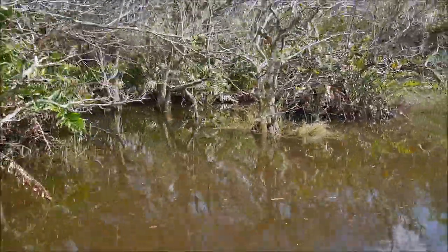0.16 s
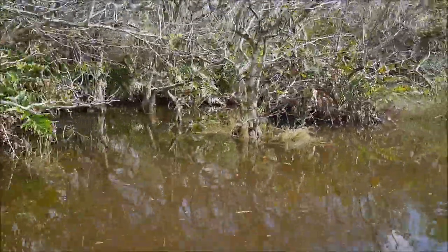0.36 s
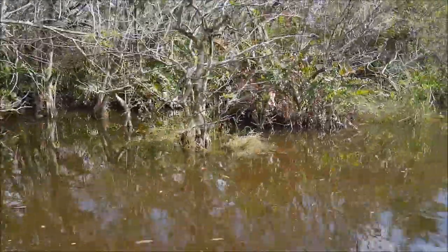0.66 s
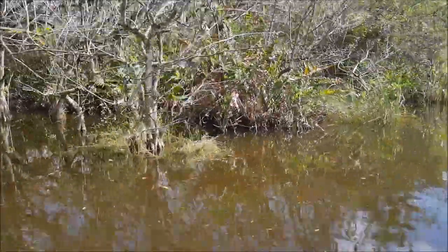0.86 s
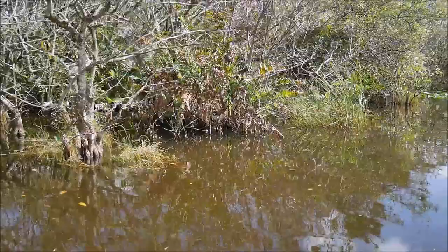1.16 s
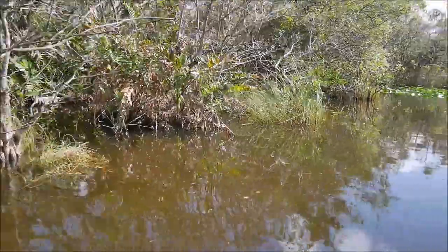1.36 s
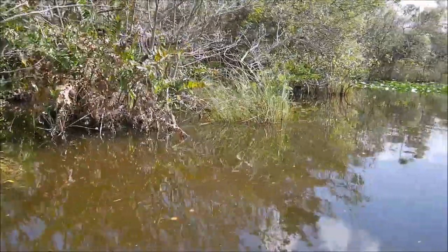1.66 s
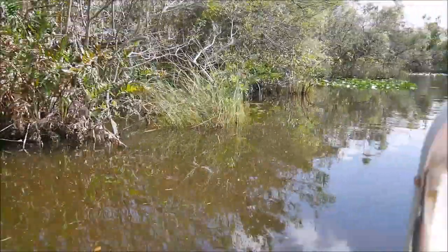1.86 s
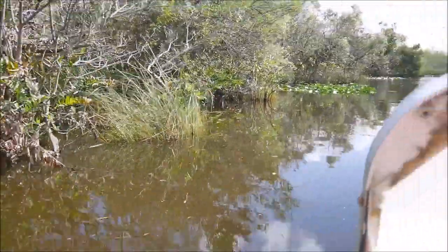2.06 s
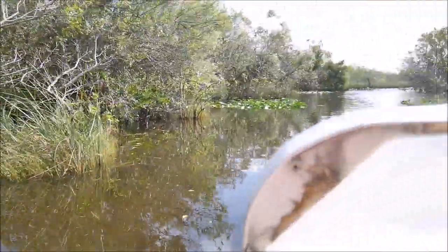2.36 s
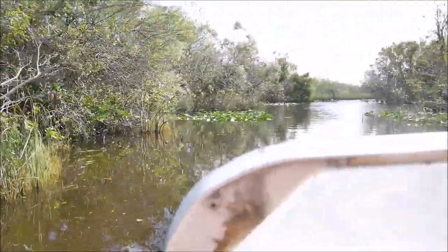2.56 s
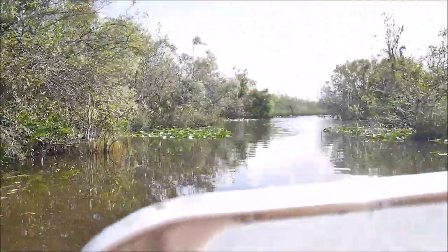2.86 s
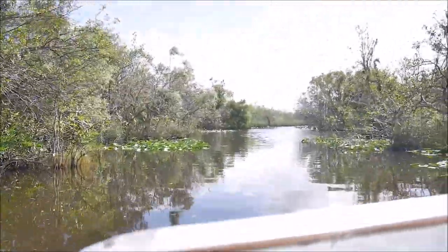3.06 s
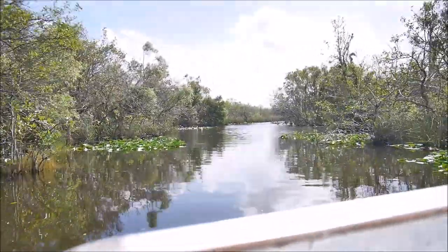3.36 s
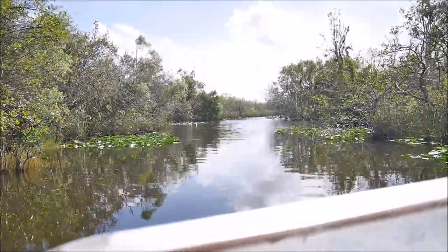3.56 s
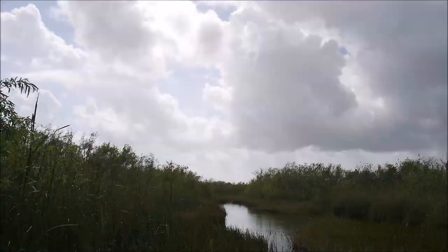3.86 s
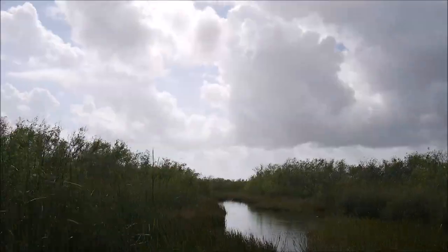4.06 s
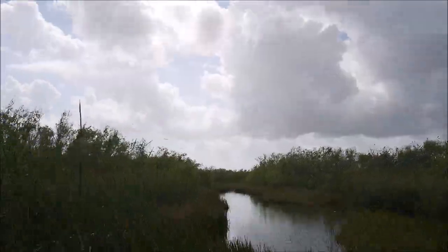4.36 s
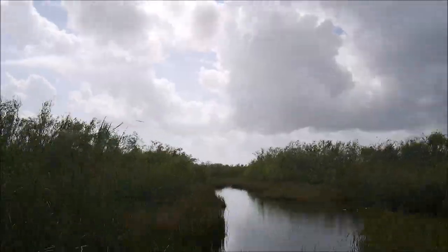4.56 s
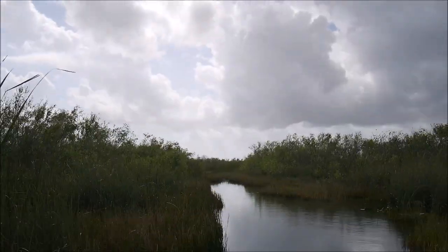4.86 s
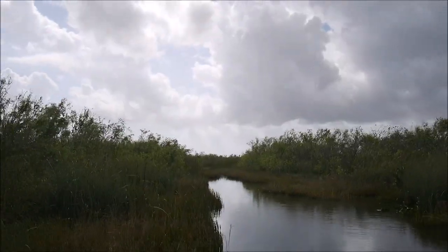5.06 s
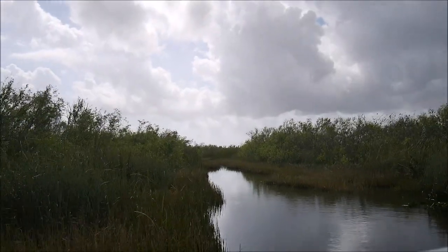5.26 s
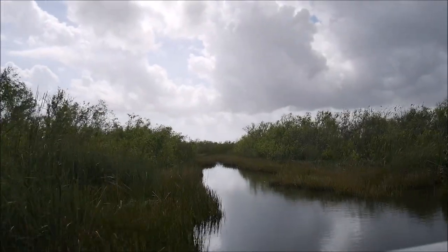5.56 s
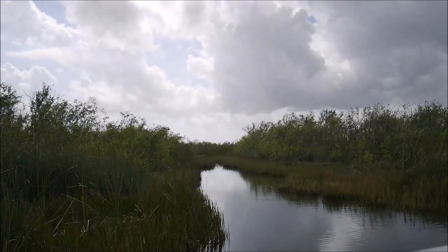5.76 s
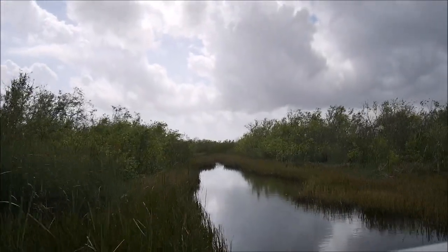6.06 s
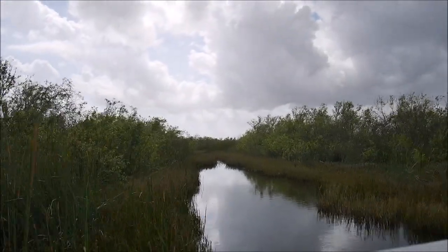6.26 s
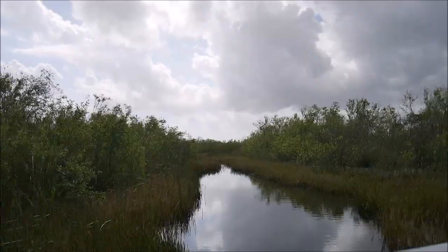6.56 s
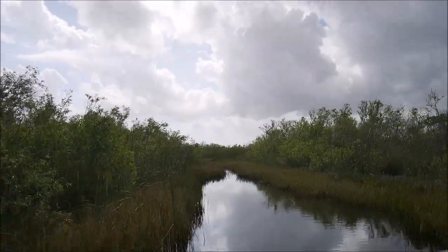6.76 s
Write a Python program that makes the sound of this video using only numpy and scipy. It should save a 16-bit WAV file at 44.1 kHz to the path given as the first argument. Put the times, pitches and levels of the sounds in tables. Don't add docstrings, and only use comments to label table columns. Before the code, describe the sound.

From 0 to 3.85 seconds an airboat idles on open water, heard from its deck. A low, harmonic engine drone and soft turbulent roar carry a quick flutter of about sixteen shaft turns per second; each turn brings uneven propeller swishes, airy whistles near 9 kHz that slide downward. The load and brightness drift gently. A thin gear whine near 1.75 kHz wavers in and out, clearest around 2.2 seconds. Light wind puffs appear from 2.8, with short buffets at 3.1 and 3.3. Sound cuts to silence until 4.15. Then, abruptly, the boat is at speed: a much louder, denser drone at about thirty turns per second, with rapid blade buzz and fainter high hiss. Sharp wind thumps and raspy flaps batter the stereo microphone, densest from 4.5 to 5.8, ducking the engine briefly. Bright slaps stand out near 5.4, 5.7, 6.1 and 6.5. It stops at full roar around 6.9.

```python
import sys
import numpy as np
from scipy import signal
from scipy.fft import rfft, irfft
from scipy.io import wavfile
from scipy.ndimage import uniform_filter1d

SR = 44100
rng = np.random.default_rng(int(sys.argv[2]) if len(sys.argv) > 2 else 0)


def wav_out(sig):
    wavfile.write(sys.argv[1], SR, np.round(np.clip(np.atleast_2d(sig).T, -1, 1) * 32767).astype(np.int16))


def invert_db(level):
    return 10 ** (np.asarray(level, dtype=float) / 20)


N = 304290

# (start [s], end [s])
SLOW_SPAN, FAST_SPAN = (0, 3.851), (4.1495, 6.9)


def evened(x):
    return x / np.sqrt(np.mean(abs(x) ** 2) + 1e-20)


def read(points, hz):
    f, value = np.transpose(points)
    return np.interp(np.log(hz + 1), np.log(f + 1), value)


def curves(rows, t):
    s, *columns = np.transpose(rows)
    return [np.interp(t, s, c) for c in columns]


def bell(t, s, length):
    return np.exp(-.5 * ((t - s) / (length / 2)) ** 2)


def drift(t, hz):
    rate = 400
    steps = np.arange(0, 7, 1 / rate)
    a, b = rng.standard_normal((2, len(steps)))
    r = np.exp(-np.pi * hz / rate)
    z = evened(signal.filtfilt([1 - r], [1, -r], a + 1j * b))
    return np.interp(t, steps, z.real) + 1j * np.interp(t, steps, z.imag)


def resonate(x, hz, width_hz):
    turn = np.exp(2j * np.pi * np.cumsum(hz) / SR)
    r = np.exp(-np.pi * width_hz / SR)
    smooth = signal.lfilter([(1 - r) ** 2], [1, -2 * r, r * r], x / turn)
    return 2 * (turn * smooth).real


def coloured(points):
    shape = invert_db(read(points, np.fft.rfftfreq(N, 1 / SR)))
    return evened(irfft(rfft(rng.standard_normal((2, N))) * shape, N))


# (multiple of the shaft rate [1], level [dB])
SLOW_TONES = [(3, -32), (5, -32), (6, -32.5), (7, -32.5), (8, -30.5), (9, -36.5), (10, -38), (11, -24.5),
              (12, -33), (13, -29), (14, -40), (15, -25), (16, -43), (18, -33), (19, -42), (21, -34.5),
              (22, -52.5), (24, -32.5), (27, -34), (30, -40.5), (33, -45.5), (35, -75), (38, -61),
              (39, -58)]
FAST_TONES = [(3, -26), (5, -25.5), (6, -22), (8, -22), (9, -23.5), (10, -45.5), (12, -24), (13, -31),
              (15, -22), (18, -32), (21, -25), (24, -25.5), (27, -27.5), (29, -50.5), (30, -32.5),
              (32, -62.5), (33, -31.5)]
# (time [s], length [s], multiple of the shaft rate [1], lift [dB])
SLOW_BANKS = [(.3, 0.24, 8, 4), (.7, .2, 15, -8.5), (1.15, 0.14, 15, 7.5), (1.1, 0.43, 7.5, 2.5),
              (1.7, .2, 13, 6), (2.3, 0.55, 8, 5.5), (2.395, .25, 23, 13), (3.03, .25, 12, 3.5),
              (3.05, 0.44, 8, -8), (3.2, .3, 18, 4.5), (3.6, 0.19, 8, 4), (0.33, 0.17, 23, 4.5),
              (1.55, 0.31, 21, 6.5), (1.3, 0.18, 27, 5.5), (2.5, 0.43, 32, 6.5), (2.3, .2, 18, 5),
              (3.6, .2, 18, 4.5), (.4, .25, 15, 2.5), (0.99, .3, 24, 1.5)]
FAST_BANKS = [(4.3, .2, 13, -13), (4.7, .12, 6, -5), (4.95, 0.1, 6, -9), (4.95, 0.11, 13.5, 14),
              (5.4, 0.14, 13.5, 6), (5.57, .1, 13, -12), (5.6, 0.22, 8, -4), (5.95, 0.16, 9, 3.5),
              (6.0, 0.29, 15, 5.5), (6.6, .4, 9, -1.5), (4.7, .35, 3, -3.5), (5.6, 0.22, 20, 1),
              (4.6, 0.18, 20, 7.5), (4.45, .2, 18, 4), (6.0, .25, 27, 5), (6.3, .2, 18, 4),
              (5.07, .3, 12, 4), (6.8, .2, 12, 4.5), (4.5, .2, 31, 5), (6.7, .3, 30, 3.5)]
BANK_SPREAD = 0.084


def hum(t, turns, orders, load_db, banks, groups_db, splits, wander, wander_hz,
        lean_db, lean_rise_db, throb, scatter):
    out, power = np.zeros((4, 2, len(t))), np.zeros(4)
    coarse = t[::200]
    for k, db in orders:
        group = np.searchsorted(splits, k)
        loose = np.clip(wander * k, 0, 1)
        sway = np.sqrt(1 - loose ** 2) + loose * drift(t, wander_hz)
        right_db = lean_db + lean_rise_db * (k / 30) ** 2
        ports = invert_db(right_db * np.array([[-.5], [.5]]))
        phase = 2 * np.pi * (round(k) * (turns - throb) + scatter * rng.random())
        tone = (sway * np.exp(1j * phase)).real
        echo_db = 0
        for s, length, near, lift_db in banks:
            closeness = bell(np.log(k / near), 0, 2 * BANK_SPREAD)
            echo_db = echo_db + lift_db * bell(coarse, s, length) * closeness
        out[group] += invert_db(db + np.interp(t, coarse, echo_db)) * ports * tone
        power[group] += invert_db(db) ** 2 / 2
    levelled = [invert_db(db) * tones / np.sqrt(p) for db, tones, p in zip(groups_db, out, power)]
    return invert_db(load_db) * sum(levelled)


# (frequency [Hz], density [dB per Hz])
SLOW_ROAR = [(40, -41), (62, -23), (76, -12.5), (180, -5), (400, -3), (600, -7.5), (1000, -17.5),
             (1400, -23.5), (1800, -23.5), (2800, -30), (3500, -26), (4100, -30.5), (5700, -31.5),
             (9000, -18), (13000, -30.5), (16000, -43)]
FAST_ROAR = [(40, -9), (62, -8.5), (76, -9), (250, -4), (450, -5), (720, -12.5), (1100, -20.5), (1700, -28),
             (3000, -32), (6000, -35), (8500, -37), (13000, -33.5), (16000, -40)]
# (frequency [Hz], likeness [0-1])
LIKENESS = [(60, 0.98), (120, 0.99), (240, 0.99), (480, 0.98), (950, 0.76), (1890, 0.47), (3770, 0.55),
            (7520, 0.76), (15000, 0.55)]
# (frequency [Hz], left minus right [dB])
BALANCE = [(60, -4), (150, -4), (380, -2), (950, -4), (2380, 0.5), (5980, 0.5), (15000, -2.5)]


def roar(spectrum, low_db, high_db, t, split_hz, patchy_db):
    frames, hz = len(t) // 256 + 5, np.fft.rfftfreq(1024, 1 / SR)
    a, b, c, d, patches = rng.standard_normal((frames, 513, 5)).T
    patches = uniform_filter1d(patches, size=8, axis=0)
    patches = evened(uniform_filter1d(patches, size=10, axis=1))
    at = np.minimum(np.arange(frames) * 256, len(t) - 1)
    high = (hz ** 2 / (hz ** 2 + split_hz ** 2))[:, None]
    level_db = (1 - high) * (low_db[at] - low_db.mean()) + high * (high_db[at] - high_db.mean())
    same = np.clip(read(LIKENESS, hz), -1, 1)[:, None]
    left = a + 1j * b
    right = same * left + np.sqrt(1 - same ** 2) * (c + 1j * d)
    z = np.array([left, right])
    z *= invert_db(read(spectrum, hz)[:, None] + level_db + patchy_db * patches)
    z *= invert_db(np.outer([.5, -.5], read(BALANCE, hz)))[:, :, None]
    return evened(signal.istft(z, nperseg=1024, noverlap=768)[1][:, :len(t)])


# (place in the turn [0-1], rise [turns], fall [turns], whistle [dB], hiss [dB],
# whistle pitch on arriving [Hz], pitch loss [Hz per turn])
SLOW_BLADES = [
    (.1, .065, .17, 0, -7, 9250, 5800),
    (.45, .09, .12, -20, -10, 9600, 3000),
    (.76, .065, .085, -4, -4, 9700, 6000),
]
FAST_BLADES = [
    (.67, .04, .04, 0, 0, 10300, 900),
    (.0, .05, .05, -7, -8, 10000, 900),
    (.36, .05, .08, -14, -8, 10000, 900),
]


def swish(turns, blades, narrow_hz, pure, wide_hz, wide_db, wide_up_hz, uneven_db, same):
    out = np.zeros((2, len(turns)))
    sweep = np.linspace(.85, 1.12, len(turns))
    for place, rise, fall, db, hiss_db, hz, loss_hz in blades:
        since = (turns - place + .3) % 1 - .3
        passing = np.floor(turns - place + .3).astype(int)
        strength = rng.standard_normal(300)[passing]
        opening = np.exp(-.5 * (since / rise) ** 2)
        closing = 1 / np.cosh(1.2 * since / fall)
        gate = np.where(since < 0, opening, closing)
        whistle_hz = hz - loss_hz * sweep * np.clip(since, -.15, .32)
        a, b = rng.standard_normal((2, len(turns)))
        air = np.array([a, same * a + np.sqrt(1 - same ** 2) * b])
        shedding = np.cos(2 * np.pi * np.cumsum(whistle_hz) / SR)
        whistle = evened(evened(resonate(air, whistle_hz, narrow_hz)) + pure * shedding)
        hiss = evened(resonate(air, np.full(len(a), hz + wide_up_hz), wide_hz))
        tip = invert_db(db) * whistle + invert_db(hiss_db + wide_db) * np.sqrt(gate) * hiss
        out += invert_db(uneven_db * strength) * gate * tip
    return evened(out)


# (time [s], speed [turns per s])
SHAFT = [
    (0, 16.06),
    (3.9, 16.06),
    (4.15, 30.22),
    (4.5, 30.19),
    (6.15, 30.19),
    (6.35, 30.0),
    (6.9, 30.05),
]
START_TURN = (1.0, 1.05)
# (time [s], load [dB], facing [dB])
SLOW_RIDE = [(0, -6, 1), (.5, -0.5, 2.5), (.95, -3.5, 0.5), (1.4, -1.5, 0.5), (2.0, 0.5, -1.5),
             (2.5, 1, -2.5), (3.15, 2, 0.5), (3.45, 0, -2.5), (3.85, 0.5, 2.5)]
FAST_RIDE = [(4.15, -0.88, 3.5), (4.5, 0.58, -2), (4.7, 0.32, 3.5), (5.1, 0, -0.5), (5.4, -0.25, -2.5),
             (5.6, -1.2, -4.5), (6.03, 0.042, -1), (6.4, 0.62, 2.5), (6.9, -1, -2.5)]
# (time [s], lift [dB], length [s])
SLAPS = [
    (4.26, 1.5, 0.073),
    (4.676, 3.5, 0.055),
    (5.392, 9.5, .04),
    (5.67, 7, 0.061),
    (5.924, 5, 0.033),
    (6.075, 7.5, 0.062),
    (6.534, 9, 0.023),
    (6.664, 3, .05),
]


def stretch(span, rows, orders, spectrum, blades, roar_db, swish_db,
            roar_by_load, hiss_by_load, hiss_by_facing, tones, air, tips):
    first = round(span[0] * SR)
    t = np.arange(first, min(round(span[1] * SR), N)) / SR
    speed = curves(SHAFT, t)[0]
    turns = START_TURN[first > 0] + np.cumsum(speed) / SR
    load_db, facing_db = curves(rows, t)
    slap_db = sum(db * bell(t, s, length) for s, db, length in SLAPS)
    high_db = hiss_by_load * load_db + hiss_by_facing * (facing_db + slap_db)
    part = hum(t, turns, orders, load_db, **tones)
    part += invert_db(roar_db) * roar(spectrum, roar_by_load * load_db, high_db, t, **air)
    left_lean = invert_db(np.array([[.4], [-.4]]))
    part += invert_db(facing_db + slap_db + swish_db) * swish(turns, blades, **tips) * left_lean
    out = np.zeros((2, N))
    out[:, first:][:, :len(t)] = part
    return out


# (time [s], pitch [Hz], level [dB])
WHINE = [
    (0, 1720, -56),
    (.15, 1765, -44.5),
    (.6, 1766, -46.5),
    (.75, 1750, -55),
    (1.4, 1756, -48),
    (1.9, 1770, -52),
    (2.22, 1776, -43),
    (2.9, 1727, -52.5),
    (3.2, 1790, -57),
]


def whine():
    t = np.arange(N) / SR
    hz, db = curves(WHINE, t)
    tone = (.75 + .5 * drift(t, 20)) * np.exp(2j * np.pi * np.cumsum(hz) / SR)
    lead = np.exp(1j * np.array([[.7], [-.7]]))
    return 2.78 * invert_db(db) * (tone * lead).real * (t < SLOW_SPAN[1])


# (time [s], level [dB], length [ms], rasp beside it [dB])
BREEZE = [
    (2.8, -38, 33, -25),
    (3.09, -27, 20, -18),
    (3.27, -28, 88, -28),
    (3.37, -38, 20, -27),
    (3.45, -33, 25, -22),
    (3.76, -31.5, 40, -23),
]
GUSTS = [(4.295, -19, 9.2, -24), (4.483, -14.5, 7, -18.5), (4.54, -18.5, 28, -22), (4.584, -9.5, 10, -23),
         (4.7, -13.5, 54, -17.5), (4.747, -16, 6.3, -11), (4.822, -10.5, 8, -8), (4.879, -17.5, 22, -13),
         (4.96, -19.5, 25, -6.5), (5.029, -16, 9, -19), (5.081, -14, 10, -17), (5.158, -11, 22, -16),
         (5.293, -11, 19, -17), (5.33, -23.5, 16, -5), (5.39, -16, 24, -19), (5.485, -14.5, 22, -17),
         (5.521, -16, 18, -9), (5.65, -17.5, 34, -17.5), (5.698, -11.5, 12.6, -11), (5.739, -11, 12, -6.5),
         (5.755, -14.5, 5.4, -2.5), (6.057, -27, 12, -16), (6.16, -22.5, 30, -13), (6.25, -17.5, 30, -14.5),
         (6.433, -15, 27, -8), (6.543, -15.5, 12, -10), (6.602, -20, 20, -23), (6.702, -16.5, 23, -20),
         (6.805, -10.5, 10, -20), (6.85, -11, 32, -16)]
WIND_FLOOR_DB = -29.5
THUD_DB, THUD_SHARE = -20, 0.53
# (frequency [Hz], density [dB per Hz])
THUD = [(20, -4), (55, -6), (90, -13), (200, -1), (300, -3), (500, -25), (1500, -90)]
FLAP = [(60, -60), (200, -18), (330, -3), (480, 0), (1000, -4), (1400, -11), (2500, -32), (6000, -90)]
RASP = [(200, -70), (700, -25), (1300, -1), (2000, -6), (3500, -19), (6000, -42), (12000, -90)]


def wind():
    t = np.arange(N) / SR
    power = np.zeros((3, N))
    for s, db, ms, rasp_db in BREEZE + GUSTS:
        thud_db = THUD_DB + THUD_SHARE * (db + 17.5) - db
        near = slice(round((s - .2) * SR), round((s + .2) * SR))
        bump = np.exp(-.5 * ((t[near] - s) / (.00036 * ms)) ** 2)
        layers_db = db + np.array([[thud_db + 2], [-1.5], [rasp_db - 2.5]])
        power[:, near] += invert_db(layers_db) ** 2 * bump
    floor_db = WIND_FLOOR_DB + np.array([[0], [0], [-15]])
    power += invert_db(floor_db) ** 2 * (t > FAST_SPAN[0])
    lumps = invert_db(0.9 * drift(t, 45).real)
    out = np.zeros((2, N))
    for layer, colour, pull in zip(power, (THUD, FLAP, RASP), (0, .6, .65)):
        against, together = coloured(colour)
        pair = np.array([against, -against]) + (1 - pull) * together
        out += np.sqrt(layer) * lumps * pair
    return invert_db(np.array([[-3], [1.5]])) * out


DUCK_DB, DUCK_KNEE_DB, DUCK_RECOVER_S = 5, -18, 0.052


def ducking():
    t, step = np.arange(0, N, 50) / SR, 50 / SR
    push = 0
    for s, db, ms, rasp_db in GUSTS:
        push = push + invert_db(db + rasp_db - DUCK_KNEE_DB) * bell(t, s, ms / 1000) * ms / 20
    r = np.exp(-step / DUCK_RECOVER_S)
    dip_db = -DUCK_DB * np.tanh(2.45 * signal.lfilter([1 - r], [1, -r], push))
    return invert_db(np.interp(np.arange(N) / SR, t, dip_db))


def scene():
    slow_tones = dict(banks=SLOW_BANKS, groups_db=(-22, -22, -25.5, -47), splits=(10.5, 16.5, 34.5),
                      wander=.015, wander_hz=1.5, lean_db=1.1, lean_rise_db=.9, throb=0, scatter=1)
    fast_tones = dict(banks=FAST_BANKS, groups_db=(-21.0, -13.5, -22.0, -28.5), splits=(5.5, 10.5, 16.5),
                      wander=.012, wander_hz=5., lean_db=1.8, lean_rise_db=7., throb=.38, scatter=.35)
    slow_tips = dict(narrow_hz=750, pure=1.1, wide_hz=2600, wide_db=-2.2, wide_up_hz=700,
                     uneven_db=.7, same=.82)
    fast_tips = dict(narrow_hz=4500, pure=0, wide_hz=3000, wide_db=-1.0, wide_up_hz=3000,
                     uneven_db=3.2, same=.5)
    slow = stretch(SLOW_SPAN, SLOW_RIDE, SLOW_TONES, SLOW_ROAR, SLOW_BLADES, roar_db=-21, swish_db=-28.5,
                   roar_by_load=1.03, hiss_by_load=-0.17, hiss_by_facing=0.36,
                   tones=slow_tones, air=dict(split_hz=1200, patchy_db=1.05), tips=slow_tips)
    fast = stretch(FAST_SPAN, FAST_RIDE, FAST_TONES, FAST_ROAR, FAST_BLADES, roar_db=-17.5, swish_db=-39.5,
                   roar_by_load=.6, hiss_by_load=.3, hiss_by_facing=0.26,
                   tones=fast_tones, air=dict(split_hz=3500, patchy_db=1.65), tips=fast_tips)
    return slow + fast * ducking() + whine() + wind()


def top_cut(x):
    return signal.sosfilt(signal.butter(12, 16310, fs=SR, output="sos"), x)


def record(dry):
    wind_cut = signal.butter(7, 72, "high", fs=SR, output="sos")
    cut = signal.sosfilt(wind_cut, dry)
    cut = cut + invert_db(-21) * (dry - cut)
    cut = signal.lfilter(*signal.iirnotch(7848, 42, SR), cut)
    band_limit = signal.firwin(401, 15500, window=("kaiser", 8), fs=SR)
    cut = signal.oaconvolve(cut, band_limit[None], "same")
    t = np.arange(N) / SR
    sounding = (t < SLOW_SPAN[1]) | (t >= FAST_SPAN[0])
    fade = np.clip(abs(t - FAST_SPAN[0]) / .005, 0, 1)
    mix = np.clip(cut * sounding * fade, -.98, .98)
    return top_cut(mix)


dry = scene()
out = record(dry)
wav_out(out)
```